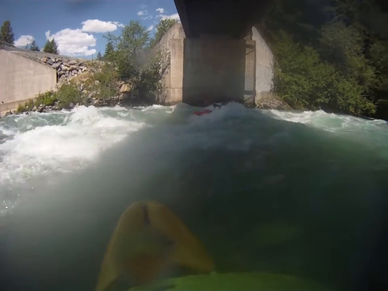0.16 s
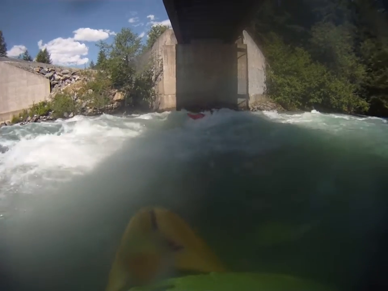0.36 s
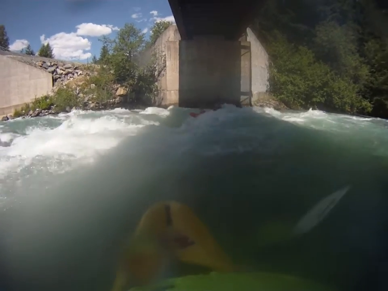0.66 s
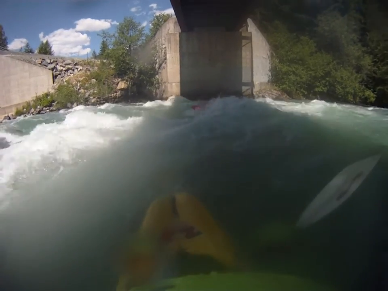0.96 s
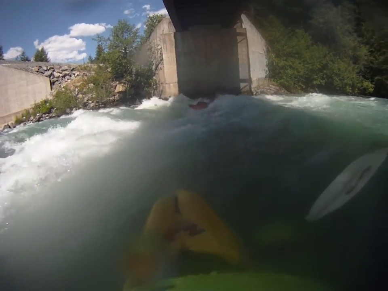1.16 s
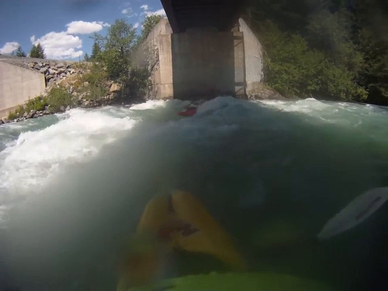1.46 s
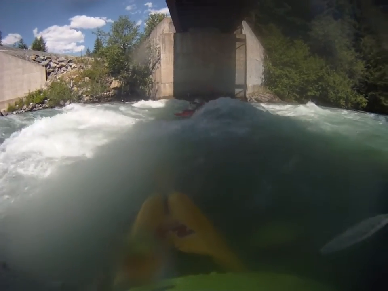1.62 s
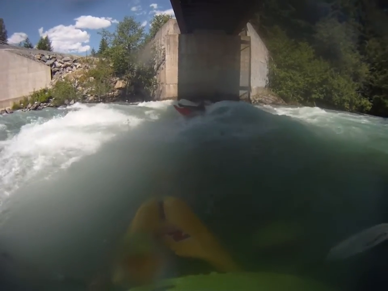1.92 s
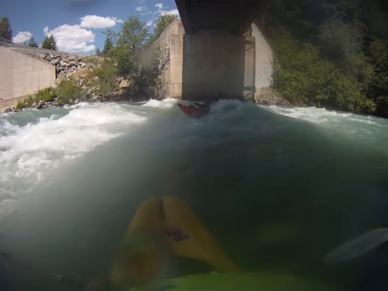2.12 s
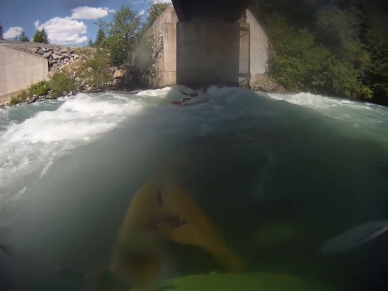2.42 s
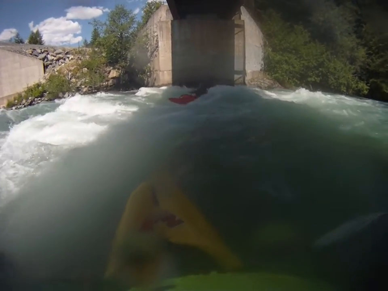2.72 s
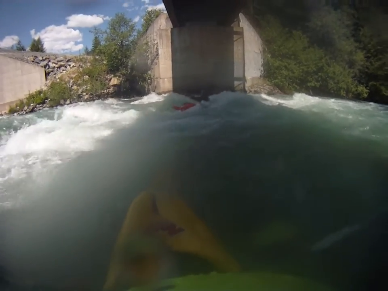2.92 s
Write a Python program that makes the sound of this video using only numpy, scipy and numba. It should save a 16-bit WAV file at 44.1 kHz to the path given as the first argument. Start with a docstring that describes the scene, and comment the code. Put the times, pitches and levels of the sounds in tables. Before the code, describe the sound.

Dense whitewater roars without pause around a kayak under a concrete bridge, nearly level with slight flicker; a sealed camera housing gives it a hollow, nasal ring and gritty treble, with a faint low hum beneath.

```python
"""Under a concrete bridge, whitewater roars around a kayak, heard by a camera sealed in a waterproof housing.
Flickering bands of hiss and thousands of short rising rings, the foam and its bursting bubbles, merge into a
churning roar that the housing colours with a strong ring near 2.3 kHz. Beneath it, a throbbing tone that sinks
in pitch, perhaps traffic on the deck, and deep filtered noise, the deck's rumble, come and go.
The camera samples coarsely and holds each sample four times, which adds a mirrored, gritty treble."""
import sys
import numpy as np
from scipy import signal
from scipy.fft import rfft, irfft
from scipy.io import wavfile
from scipy.ndimage import uniform_filter1d
from numba import njit

SR = 44100
rng = np.random.default_rng(int(sys.argv[2]) if len(sys.argv) > 2 else 0)


def decibels_to_gain(level_db):
    """Convert a level in decibels to a linear amplitude gain (20 dB per decade)."""
    exponent = np.asarray(level_db, float) / 20
    return 10 ** exponent


def persist_wave(psi):
    """Save psi, clipped to +-1, as 16-bit WAV."""
    counts = np.round(np.clip(psi, -1, 1) * 32767).astype(np.int16)
    wavfile.write(sys.argv[1], SR, np.atleast_2d(counts).T)


N = 135828  # length in samples, about 3.1 s


def walk(rate_hz):
    """Smooth random control: levels held for 1 / rate_hz s, slewed twice, with mean 0 and deviation 1."""
    hold = int(SR / rate_hz)
    steps = np.repeat(rng.standard_normal(N // 200 + 2), hold)[:N]
    smooth = uniform_filter1d(uniform_filter1d(steps, hold), hold)
    return (smooth - smooth.mean()) / smooth.std()


def level(x, db):
    """Scale a sound to an rms level in dB."""
    return x * decibels_to_gain(db) / np.sqrt(np.mean(x ** 2))


def curve(table, column):
    """Draw one table column as a control over time, straight between its points."""
    rows = np.array(table, float)
    return np.interp(np.arange(N) / SR, rows[:, 0], rows[:, column])


# swells of the deck's deep rumble [t/s, level/dB]
RUMBLE_SWELLS = [(0, -70), (.4, -55), (.47, -55), (.55, -61), (1.1, -63), (1.45, -55), (1.85, -58),
                 (2.2, -63), (3.08, -65)]


def rumble():
    """Deep rumble of the deck: noise in a narrow low band, rising and falling in level."""
    low_hz, high_hz = 45, 97
    band = signal.butter(2, [low_hz, high_hz], "band", fs=SR, output="sos")
    deep = signal.sosfilt(band, rng.standard_normal(N))
    return level(deep, 0) * decibels_to_gain(curve(RUMBLE_SWELLS, 1))


# path of the hum before waver and throb [t/s, pitch f/Hz, level/dB, throb depth 0-1]
HUM_PATH = [(0, 139, -62, 0), (.78, 140, -62, 0), (.88, 140.4, -52.5, .1), (1.08, 137, -50.5, .2),
            (1.12, 135, -55, 0.1), (1.2, 136, -53, 0), (1.5, 134, -49.5, 0.1), (1.56, 133, -57, .3),
            (1.61, 132.4, -52, 0.48), (1.9, 130, -51.5, 0.58), (2.15, 129, -51, 0.29),
            (2.28, 127.2, -54, 0.53), (2.42, 129, -48, 0.3), (2.48, 129.5, -61, 0), (2.78, 124, -66, 0),
            (2.86, 122.6, -47, 0.23), (2.93, 121.9, -57, 0.23), (3.08, 122.8, -57, 0)]
HUM_THROB_HZ, HUM_PEAK_S = 10.1, 1.81  # throb rate; a moment when the throb is at its loudest
HUM_WAVER_DB, HUM_WAVER_HZ = 1.5, 2.  # random drift of level and of pitch


def hum():
    """Low sine that sinks in pitch, wavers at random and throbs as a slow cosine scales its amplitude."""
    hz = curve(HUM_PATH, 1) + HUM_WAVER_HZ * walk(15.0)
    beat = np.cos(2 * np.pi * HUM_THROB_HZ * (np.arange(N) / SR - HUM_PEAK_S))
    db = curve(HUM_PATH, 2) + HUM_WAVER_DB * walk(20.0)
    throb = 1 + np.clip(curve(HUM_PATH, 3), 0, 1) * beat
    tone = np.sqrt(2) * np.sin(2 * np.pi * np.cumsum(hz) / SR)  # rms of 1
    return decibels_to_gain(db) * throb * tone


# motion of the foam: whole roar, groups of three neighbouring bands, each band alone
SWELL_DB, CHURN_DB, FLICKER_DB = 0.38, 0.27, 0.46  # standard deviations
SWELL_HZ, CHURN_HZ, FLICKER_HZ = 3.36, 5., 18.


def foam():
    """Countless tiny bursts as white hiss in overlapping bands that swell together, churn and flicker alone."""
    octave = np.log2(np.maximum(np.arange(N // 2 + 1) * SR / N, 1.))
    white = rfft(rng.standard_normal(N))
    swell = walk(SWELL_HZ)
    churn = [walk(CHURN_HZ) for _ in range(7)]
    hiss = 0
    for k, centre in enumerate(np.arange(4, 13.5, .5)):  # octaves above 1 Hz: 16 Hz to 8.2 kHz
        share = np.clip(1 - 2 * np.abs(octave - centre), 0, 1)  # triangle reaching the next centres
        db = SWELL_DB * swell + CHURN_DB * churn[k // 3] + FLICKER_DB * walk(FLICKER_HZ)
        hiss = hiss + decibels_to_gain(db) * irfft(white * share, N)
    return level(hiss, 0)


@njit
def grains(length, start, hz, size, cycles, glide):
    """Bubble rings: each a short sine that dies away exponentially while its pitch rises."""
    out = np.zeros(length)
    for k in range(len(start)):
        span = int(cycles * SR / hz[k])
        phase = 0.
        for i in range(min(span, length - start[k])):
            phase += 2 * np.pi * hz[k] * (1 + glide * i / span) / SR
            out[start[k] + i] += size[k] * np.sin(phase) * np.exp(-6 * i / span)
    return out


BUBBLES_PER_S = 2500
BUBBLE_DB, BUBBLE_SPREAD_DB = -8, 12  # rms relative to the foam; loudest over quietest bubble
BUBBLE_CYCLES, BUBBLE_GLIDE = 15., .25  # ring length in cycles of its first pitch; rise as a fraction


def bubbles():
    """Dense bursting bubbles, each ringing at its own random pitch, many quiet and a few loud."""
    when, pitch, strength = rng.random((int(BUBBLES_PER_S * N / SR), 3)).T
    start = (when * N).astype(np.int64)
    hz = 300 + 5200 * pitch
    size = decibels_to_gain(BUBBLE_SPREAD_DB * strength ** 2)  # squaring favours the quiet ones
    return level(grains(N, start, hz, size, BUBBLE_CYCLES, BUBBLE_GLIDE), BUBBLE_DB)


# resonances and gaps of the sealed case; only differences in level count [f/Hz, level/dB]
HOUSING_COLOUR = [(12, -43), (20, -11), (60, -10.5), (130, -11.5), (207, -8.5), (414, -14.5), (593, -13.5),
                  (752, -19), (820, -13), (911, -10), (1130, -7.5), (1230, -11), (1300, -16), (1430, -8.5),
                  (1600, -10.5), (1760, -13), (1850, -9.5), (2020, -1.5), (2260, 2), (2400, 0), (2650, 1),
                  (2800, -7), (3000, -13), (3250, -18.5), (3480, -14.5), (3620, -13), (3830, -14.5),
                  (3900, -12), (4150, -12), (4330, -17.5), (4510, -18), (4630, -18.5), (5100, -16.5),
                  (5550, -15.5), (5800, -14.5), (6000, -21), (7800, -60), (13200, -120)]


def housing(x):
    """The sealed case rings at some frequencies and muffles others: a filter drawn over log frequency."""
    rows = np.array(HOUSING_COLOUR, float)
    log_hz = np.log(np.maximum(np.arange(N // 2 + 1) * SR / N, 1.))
    db = np.interp(log_hz, np.log(rows[:, 0]), rows[:, 1])
    return irfft(rfft(x) * decibels_to_gain(db), N)


# surge of the wave; only differences in level count [t/s, level/dB]
WAVE_SURGE = [(0.05, -37.5), (0.57, -37), (0.61, -38), (1.39, -37), (1.42, -38.5), (1.71, -37.5),
              (1.92, -38.5), (2.56, -38), (2.64, -36), (2.65, -38.5), (2.99, -38), (3.0, -39)]
ROAR_DB = -35.5  # rms of the roar inside the housing


def whitewater():
    """Foam and bubbles surge together as one roar, heard through the housing."""
    roar = (foam() + bubbles()) * decibels_to_gain(curve(WAVE_SURGE, 1))
    return level(housing(roar), ROAR_DB)


def scene():
    """Whitewater over the hum and rumble, in mono."""
    return (whitewater() + hum() + rumble())[None]


def low_pass(x):
    """Removes everything above the highest recorded frequency."""
    return signal.sosfilt(signal.butter(12, 16410, fs=SR, output="sos"), x)


COARSE_EDGE_HZ, TOP_HZ = 5860, 15300  # low-pass before the coarse sampling; low-pass after the hold


def record(dry):
    """The camera samples at 12 kHz and holds each sample four times, leaving mirror bands around 12 kHz."""
    edge = signal.sosfilt(signal.butter(8, COARSE_EDGE_HZ, fs=SR, output="sos"), dry)
    coarse = signal.resample_poly(edge, 40, 147, axis=1, window=("kaiser", 9.))  # to 12 kHz
    held = np.repeat(coarse, 4, axis=1)  # at 48 kHz
    final = signal.resample_poly(held, 147, 160, axis=1)[:, :N]  # back to SR
    final = np.pad(final, ((0, 0), (0, N - final.shape[1])))
    top = signal.ellip(12, .1, 40, TOP_HZ, fs=SR, output="sos")
    mix = signal.sosfiltfilt(top, final)
    return low_pass(mix)


dry = scene()
out = record(dry)
persist_wave(out)
```